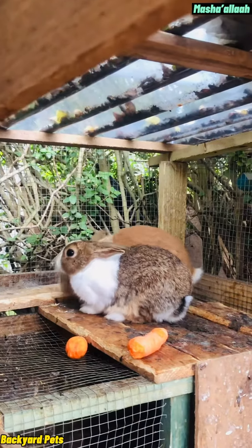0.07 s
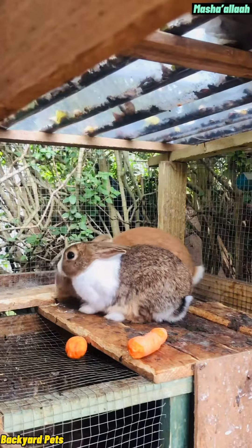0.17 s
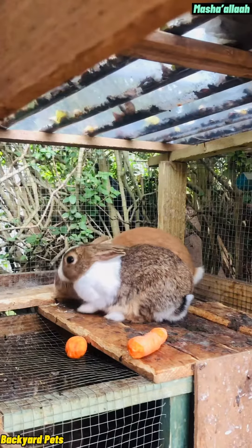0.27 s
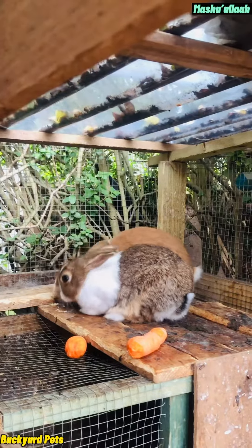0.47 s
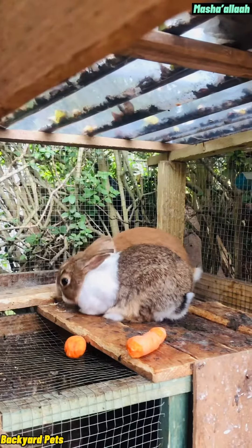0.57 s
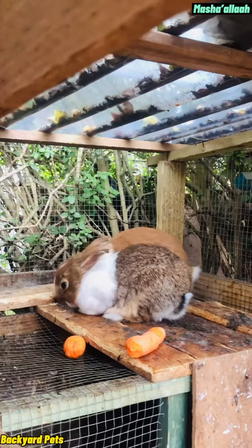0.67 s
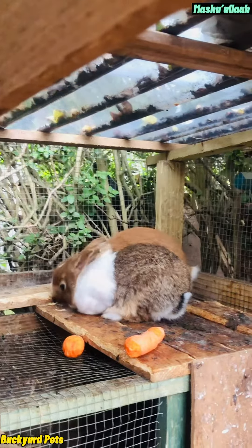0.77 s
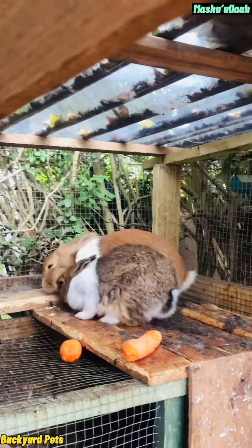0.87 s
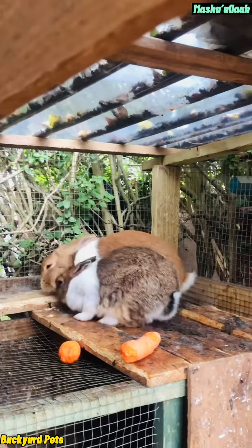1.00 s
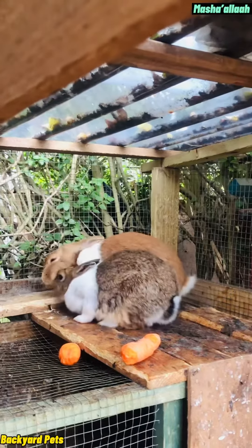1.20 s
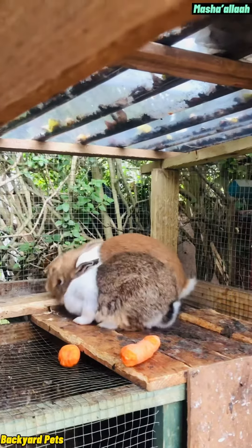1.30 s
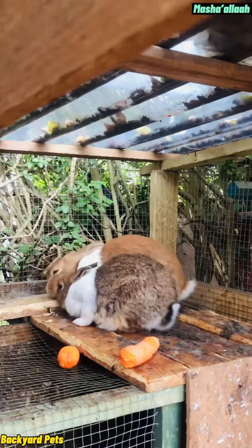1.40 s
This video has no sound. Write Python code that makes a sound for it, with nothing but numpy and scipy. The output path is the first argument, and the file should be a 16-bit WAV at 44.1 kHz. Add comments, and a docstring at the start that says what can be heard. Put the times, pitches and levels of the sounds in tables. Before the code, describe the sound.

A shrill, raspy rabbit squeal rings briefly in a wooden hutch, close by, just after a thump and a scratch. More soft thumps and knocks follow, then light rustling and distant chirps over quiet outdoor background noise.

```python
"""A wooden hutch under a plastic roof, in a garden. A rabbit squeals once: a harsh cry whose
vocal folds break upward twice, rasping in the throat and ringing in the hutch. Before and after
it, claws scratch, paws thump the boards and loose wood knocks. Faint chirps, mostly falling and
probably birds, sit over the garden's low murmur. Midway, all sound cuts out for a moment."""
import sys
import numpy as np
from scipy import signal
from scipy.fft import rfft, irfft
from scipy.io import wavfile

SR = 44100
rng = np.random.default_rng(int(sys.argv[2]) if len(sys.argv) > 2 else 0)


def master(y):
    """Save y as 16-bit WAV."""
    cut = np.clip(np.atleast_2d(y).T, -1, 1)
    pcm = np.round(cut * 32767)  # scale
    wavfile.write(sys.argv[1], SR, pcm.astype(np.int16))


N = 63945
T = np.arange(N) / SR


def amp(db):
    """Decibels to gain."""
    return 10 ** (np.asarray(db) / 20)


def unit(x):
    """Normalise to rms 1."""
    return x / np.sqrt(np.mean(x ** 2) + 1e-20)


def curve_at(points, hz):
    """Read a curve on a log-frequency axis."""
    f, value = np.transpose(points)
    return np.interp(np.log(hz + 1), np.log(f + 1), value)


def fader(times, db):
    """Ride a level curve, with a fast fade beyond either end."""
    outside = np.maximum(times[0] - T, 0) + np.maximum(T - times[-1], 0)
    return amp(np.interp(T, times, db)) * np.exp(-outside * 1000)


def shaped_noise(gain):
    """Noise at rms 1, coloured by the function gain(Hz)."""
    return unit(irfft(rfft(rng.standard_normal(N)) * gain(np.fft.rfftfreq(N, 1 / SR)), N))


def eq_noise(points):
    """Noise coloured by an EQ curve."""
    return shaped_noise(lambda f: amp(curve_at(points, f)))


def wander(hz):
    """Random modulator, rolling off above hz."""
    return shaped_noise(lambda f: 1 / (1 + (f / hz) ** 4))


def burst(start, attack, decay):
    """Envelope: linear attack, exponential decay."""
    t = np.maximum(T - start, 0)
    return np.minimum(t / attack, 1) * np.exp(-np.maximum(t - attack, 0) / decay)


def ring(start, hz, t60):
    """One struck mode ringing out."""
    t = np.maximum(T - start, 0)
    return np.sin(2 * np.pi * hz * t) * 1e-3 ** (t / t60)


# Colour of the garden bed: f/Hz, level/dB
GARDEN_EQ = [(20, -23.5), (32, -9), (50, -0.5), (86, 3), (180, -3), (250, -3.5), (420, -7), (540, -8.5),
             (730, -8), (1180, -14), (2390, -23.5), (3040, -26), (7000, -32), (15800, -41.5)]
# Its fader ride: t/s, level/dB
GARDEN_RIDE = [(0, -58.5), (.3, -61.5), (.7, -59), (0.949, -59), (1.28, -59), (1.38, -55.5), (1.45, -58.5)]
def garden(swell_db=1.32, swell_hz=25):
    """A low outdoor murmur, slightly uneven in level."""
    return eq_noise(GARDEN_EQ) * fader(*np.transpose(GARDEN_RIDE)) * amp(swell_db * wander(swell_hz))


# Distant calls: t/s, length/s, first f/Hz, last f/Hz, blur/Hz, relative level/dB
CHIRPS = [(-.03, 0.06, 4670, 4200, 400, -71.5), (0.429, .065, 4480, 3400, 455, -57),
          (0.495, 0.074, 3240, 2550, 403, -70.5), (0.612, 0.031, 2950, 3140, 150, -72.5),
          (0.983, 0.083, 4325, 3800, 220, -62.5), (0.992, .12, 3800, 2887, 500, -63),
          (1.047, 0.038, 3700, 3490, 202, -61.5), (1.092, 0.031, 2650, 2286, 149, -63),
          (1.073, 0.042, 5100, 4650, 500, -67.5), (1.183, 0.023, 1650, 2200, 149, -68.5),
          (1.349, 0.048, 5720, 4870, 283, -67), (1.379, 0.061, 4720, 4150, 180, -59.5),
          (1.425, 0.032, 3710, 3200, 244, -56)]
def chirps():
    """Hoarse far-off chirps, each a narrow band of noise on one short glide."""
    out = np.zeros(N)
    for start, length, first_hz, last_hz, blur_hz, db in CHIRPS:
        progress = np.clip((T - start) / length, 0, 1)
        phase = 2 * np.pi * np.cumsum(first_hz + (last_hz - first_hz) * progress) / SR
        fuzzy_tone = wander(blur_hz) * np.sin(phase) + wander(blur_hz) * np.cos(phase)
        out += amp(db) * np.sqrt(progress * (1 - progress)) * fuzzy_tone
    return out


# Reverb time of the hutch: f/Hz, t60/s
HUTCH_DECAY = [(200, 0.9), (2500, 0.34), (4200, 0.29), (8000, 0.19), (14000, 0.2)]
def hutch_tail(x, build_s=0.036):
    """The hutch's diffuse tail, darkening as it dies."""
    hz, t, spectrum = signal.stft(rng.standard_normal(SR // 2), SR, nperseg=256)
    decay = 1e-3 ** (t / curve_at(HUTCH_DECAY, hz)[:, None])
    tail = signal.istft(spectrum * decay, SR, nperseg=256)[1]
    tail *= np.minimum(T[:len(tail)] / build_s, 1)
    return signal.fftconvolve(x, tail / np.linalg.norm(tail))[:N]


# Bounces off boards and roof: delay/s, level/dB
REFLECTIONS = [(.0031, -37), (.0058, -26), (.0094, -14.5), (0.0126, -14.5)]
def early_reflections(x):
    """The nearest surfaces each throw back one tight slap."""
    return sum(amp(db) * np.interp(T - delay, T, x, left=0) for delay, db in REFLECTIONS)


def hutch_scatter(x, predelay_s=0.011, attack_s=0.0045, decay_s=0.017, taps_per_s=1500):
    """A short, dense spray of reflections inside the hutch."""
    taps = rng.standard_normal(N) * (rng.random(N) < taps_per_s / SR)
    impulse = (taps * burst(predelay_s, attack_s, decay_s))[:SR // 4]
    return signal.fftconvolve(x, impulse / np.linalg.norm(impulse))[:N]


# Narrow resonances of the enclosure: f/Hz, level/dB
HUTCH_MODES = [(2501, 9), (2658, 3), (3390, -3), (4083, -3.5), (4221, -5), (4691, -4), (5051, 1.5),
               (5260, -2.5), (6500, 7.5), (6815, -7.5), (9581, -3), (9855, 8.5), (13160, 3), (13600, -7)]
def hutch_ring(x, width_hz=29):
    """The enclosure favours a few pitches and rings briefly at them."""
    t = T[:SR // 4]
    damping = np.pi * width_hz
    modes = sum(amp(db) * np.cos(2 * np.pi * hz * t) for hz, db in HUTCH_MODES)
    return signal.fftconvolve(x, modes * np.exp(-damping * t) * 2 * damping / SR)[:N]


# Paw landings: t/s, level/dB, attack/s, thud decay/s
PAW_HITS = [(.079, -37, 0.0076, 0.054), (0.199, -48.5, 0.0085, 0.03), (0.375, -48, 0.0054, 0.047),
            (.422, -45, 0.0064, 0.033), (.515, -46, 0.01, 0.13), (0.899, -51.5, 0.021, 0.073),
            (1.366, -62, 0.0057, 0.016)]
# Body of the floorboards: f/Hz, level/dB, t60/s
BOARD_MODES = [(82.6, -8.5, 0.83), (136.7, 4.5, 0.27), (179, -2.5, 0.077), (241.5, -2.5, 0.06),
               (372, -14.5, .35), (560, -42, 0.17)]
def paw_thumps(thud_db=-9, thud_hz=290):
    """Each paw lands with a dull thud and rings the low modes of the boards."""
    thud = shaped_noise(lambda f: f ** 2 / (70 ** 2 + f ** 2) / (1 + (f / thud_hz) ** 4))
    out = np.zeros(N)
    for start, db, attack, decay in PAW_HITS:
        modes = sum(amp(mode_db) * ring(start, hz, t60) for hz, mode_db, t60 in BOARD_MODES)
        boom = 0.58 * modes * burst(start, attack, 4 * decay)
        out += amp(db) * (boom + amp(thud_db) * thud * burst(start, attack, decay))
    return out


# Hits of loose wood: t/s, level/dB, f/Hz, t60/s, relative clatter/dB
WOOD_HITS = [(.078, -55.5, 874, .11, 6.5), (.494, -52.5, 1184, 0.16, -3), (.513, -53, 427, 0.18, 4.5),
             (.545, -43.5, 77, 0.16, 6), (0.588, -41.5, 796, 0.036, -9), (.72, -59, 945, 0.034, 5.5),
             (1.365, -52.5, 522, 0.077, 0)]
# Partials of a knock: ratio to its pitch, level/dB
WOOD_MODES = [(1, 2), (1.55, -10), (2.75, -15)]
# Colour of the clatter: f/Hz, level/dB
CLATTER_EQ = [(100, 11.5), (300, 4), (1200, -3), (2800, -2.5), (6000, -35), (16000, -50)]
def wood_knocks(attack_s=0.0023):
    """Loose wood knocks: hollow modes plus a brief clatter, turned down for low-pitched hits."""
    noise, out = eq_noise(CLATTER_EQ), np.zeros(N)
    for start, db, hz, t60, clatter_db in WOOD_HITS:
        modes = sum(amp(mode_db) * ring(start, hz * ratio, t60) for ratio, mode_db in WOOD_MODES)
        body = modes * np.clip((T - start) / attack_s, 0, 1)
        clatter = noise * min(hz / 700, 1) * burst(start, attack_s, t60 / np.log(1000))
        out += amp(db) * (body + amp(clatter_db) * clatter)
    return out


# Claw strokes on wood: t/s, level/dB, attack/s, decay/s
CLAW_STROKES = [(0.063, -58.5, 0.0034, 0.028), (0.0698, -47.5, 0.00079, 0.004),
                (.077, -42.5, 0.00051, 0.0033), (0.488, -51, 0.0043, .008), (0.499, -47.5, 0.0051, 0.0057),
                (.504, -42.5, 0.00039, 0.0069), (0.507, -42.5, 0.00092, 0.0031), (0.589, -66, .002, .008),
                (0.713, -63, 0.0045, .012), (1.365, -72, 0.0024, 0.0027)]
# Fur and bedding shifting: t/s, level/dB
RUSTLE_RIDE = [(.85, -73), (.93, -77.5), (.975, -66.5), (1.04, -82.5), (1.101, -65), (1.14, -78),
               (1.2, -80), (1.28, -71), (1.32, -95), (1.45, -87)]
# Colour of both: f/Hz, level/dB
CLAW_EQ = [(200, -7.5), (1200, -5.5), (2200, -1.5), (3500, 0.5), (6500, -2.5), (10000, -6), (14000, -0.5),
           (16000, -3.5)]
def claws_and_rustle(grit=0.34, grit_hz=2500):
    """Claws scrape the wood in short, gritty strokes over a faint rustle."""
    strokes = sum(amp(db) * burst(start, attack, decay) for start, db, attack, decay in CLAW_STROKES)
    texture = unit(eq_noise(CLAW_EQ) * np.exp(grit * wander(grit_hz)))
    return texture * (strokes + fader(*np.transpose(RUSTLE_RIDE)))


# Resonances of throat and mouth: f/Hz, width/Hz, level/dB
FORMANTS = [(2670, 210, -8), (3350, 130, -27), (4300, 290, -18), (4650, 330, 1), (5126, 260, 2.5),
            (5770, 220, -3), (6260, 240, 1), (6730, 137, 1), (8940, 450, -5.5), (9200, 270, -19),
            (11270, 230, -11.5), (13300, 1200, -5.5), (15870, 420, -31)]
# Rasp through the cry: t/s, level/dB
RASP_RIDE = [(0.192, -58), (.2, -43.5), (.215, -38.5), (.236, -49), (.247, -28), (.262, -33.5), (.28, -51),
             (.295, -31), (.32, -46.5), (.338, -63), (.36, -43), (.39, -76)]
def throat_rasp(flutter=0.25, flutter_hz=400):
    """Chaotic vibration rings the throat's resonances in uneven spurts."""
    def formant_gain(f):
        peaks = (amp(db) ** 2 / (1 + (2 * (f - hz) / width) ** 2) ** 1.13 for hz, width, db in FORMANTS)
        return np.sqrt(sum(peaks))
    spurts = shaped_noise(formant_gain) * np.exp(flutter * wander(flutter_hz))
    return unit(spurts) * fader(*np.transpose(RASP_RIDE))


# Pitch shake through the cry: t/s, rms depth/share of the pitch
JITTER_DEPTH = [(.195, 0.022), (.215, 0.013), (.236, 0.0045), (.25, 0.013), (.275, 0.0069), (.3, 0.011),
                (.342, 0.0045), (.36, 0.012), (.39, 0.016)]
def vocal_folds(contour, harmonics_db, brighten_db=0, jitter_hz=443, shimmer=0.37, shimmer_hz=383):
    """One register of the voice: the folds' harmonics, shaky in pitch and strength."""
    times, hz, db = np.transpose(contour)
    jitter = np.interp(T, *np.transpose(JITTER_DEPTH)) * wander(jitter_hz)
    phase = 2 * np.pi * np.cumsum(np.interp(T, times, hz) * (1 + jitter)) / SR
    cry_start = LOW_REGISTER[0][0]
    bloom = 1 - np.exp(-np.maximum(T - cry_start, 0) / 0.0097)  # upper harmonics open as the cry starts
    shrill = amp(brighten_db * np.interp(T, times[[0, -1]], [-.5, .5]))
    tone = 0
    for k, harmonic_db in enumerate(harmonics_db, 1):
        gain = amp(harmonic_db) * (bloom if k > 2 else 1) * (shrill if k > 1 else 1)
        tone += gain * np.sin(k * phase) * (1 + shimmer * wander(shimmer_hz))
    return unit(tone) * fader(times, db)


# Contours of the cry's three registers: t/s, f/Hz, level/dB
LOW_REGISTER = [(.196, 2100, -41.5), (.203, 2400, -39.5), (.21, 2533, -33), (.217, 2557, -32),
                (.225, 2571, -36.5), (.235, 2630, -35), (.253, 2626, -33.5), (.274, 2640, -57),
                (.293, 2630, -38.5), (.304, 2640, -38), (.322, 2655, -35.5), (.335, 2650, -62)]
MID_REGISTER = [(.238, 3170, -64), (.252, 3116, -47), (.266, 3209, -35), (.281, 3373, -30.5),
                (.303, 3476, -38.5), (.316, 3250, -46)]
HIGH_REGISTER = [(.318, 4040, -46.5), (.332, 4120, -24), (.349, 4060, -32), (.361, 4200, -23),
                 (.372, 4366, -36.5), (.38, 4440, -33.5), (.387, 4295, -41), (.398, 4220, -47)]
def squeal(low_cut_hz=2467):
    """The voice jumps up through three registers, rasping at the breaks; the small throat has no lows."""
    low = vocal_folds(LOW_REGISTER, harmonics_db=[-10.5, 1.5, -11, -6, -6.5, -14])
    mid = vocal_folds(MID_REGISTER, harmonics_db=[-1, -7.5, -8.5, -7])
    high = vocal_folds(HIGH_REGISTER, harmonics_db=[0, -12.5, -15], brighten_db=2)
    low_cut = signal.butter(12, low_cut_hz, "highpass", fs=SR, output="sos")
    return signal.sosfilt(low_cut, low + mid + high + throat_rasp())


def scene():
    """Mono mix: squeal and scuffle up front in the hutch, chirps and garden behind."""
    voice = squeal()
    scuffle = claws_and_rustle() + wood_knocks()
    birds = chirps()
    near = amp(-2.5) * voice + scuffle
    front = amp(-2) * (near + early_reflections(near))
    tail = hutch_tail(amp(-15) * voice + amp(-23.5) * scuffle + amp(-6.5) * birds)
    space = amp(-10.5) * hutch_scatter(voice) + amp(2) * hutch_ring(voice) + tail
    return (front + space + paw_thumps() + amp(6) * birds + garden())[None]


def record(dry, low_cut_hz=27, high_cut_hz=15850, gap_start_s=0.786, gap_end_s=0.832, gap_db=-44):
    """The microphone sheds the deepest bass, the sound cuts out briefly and the top is rolled off."""
    low_cut = signal.butter(4, low_cut_hz, "highpass", fs=SR, output="sos")
    high_cut = signal.firwin(511, high_cut_hz, window=("kaiser", 9), fs=SR)
    gap = np.clip(np.minimum(T - gap_start_s, gap_end_s - T) / .002, 0, 1)  # 2 ms fades
    ducked = signal.sosfilt(low_cut, dry) * (1 - gap + gap * amp(gap_db))
    return signal.oaconvolve(ducked, high_cut[None], "same")


dry = scene()
out = record(dry)
master(out)
```